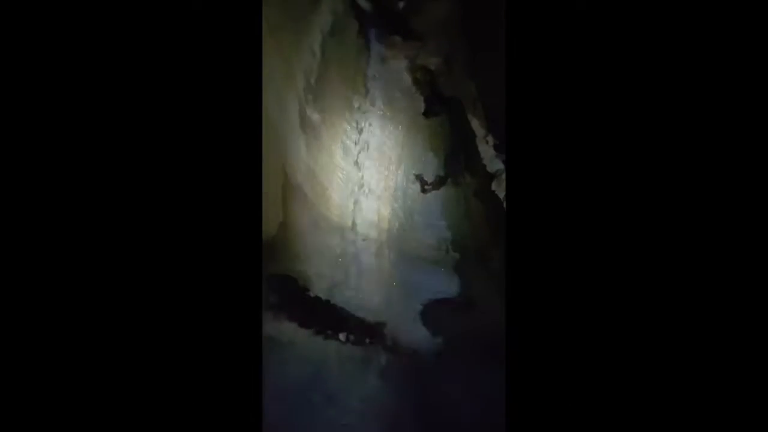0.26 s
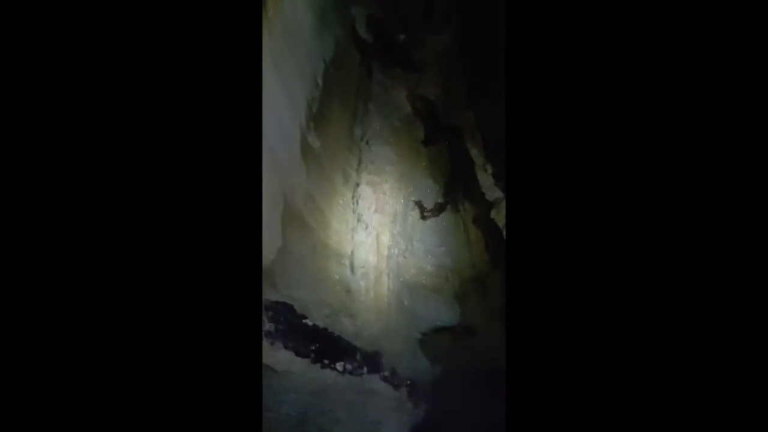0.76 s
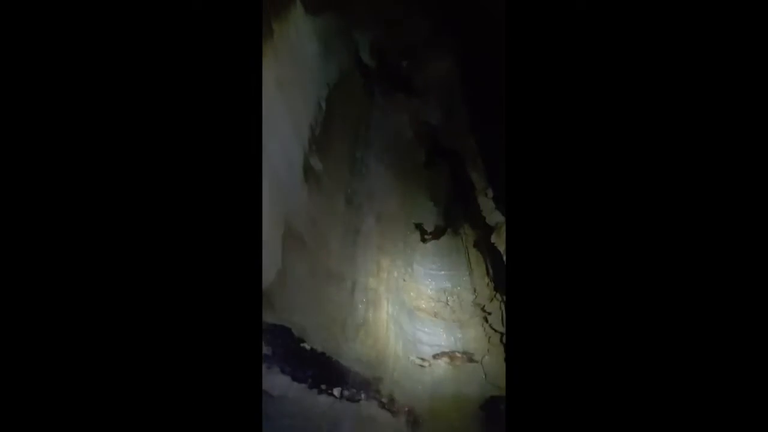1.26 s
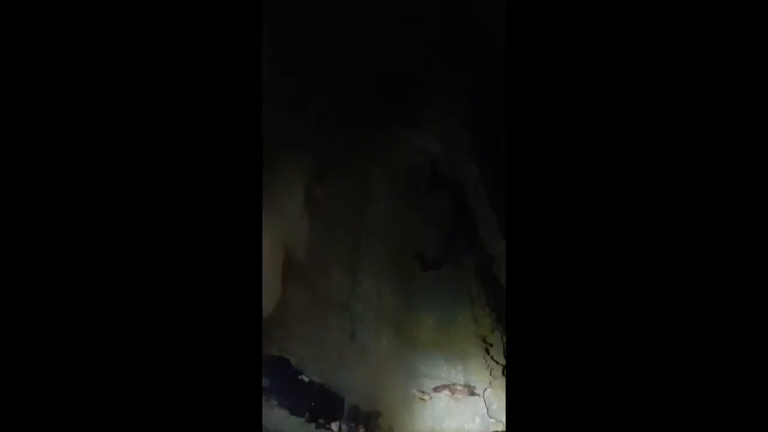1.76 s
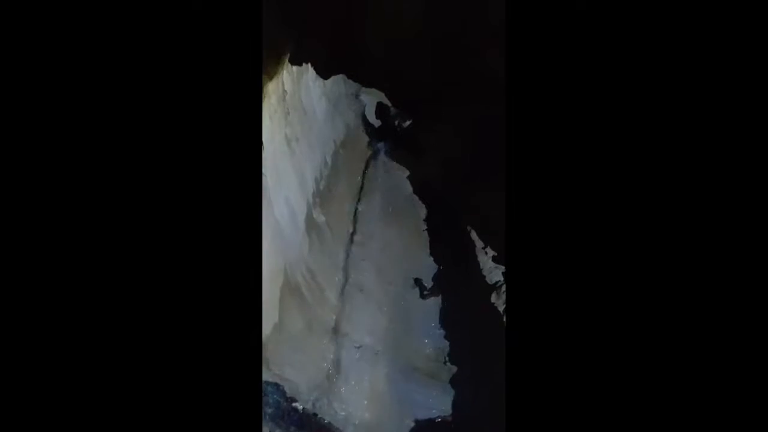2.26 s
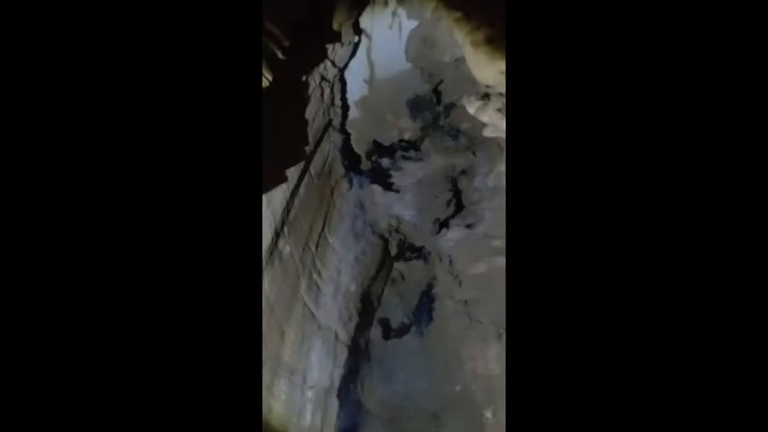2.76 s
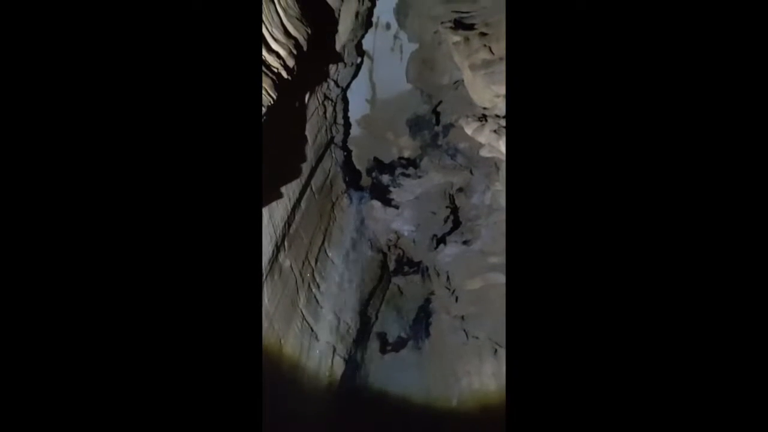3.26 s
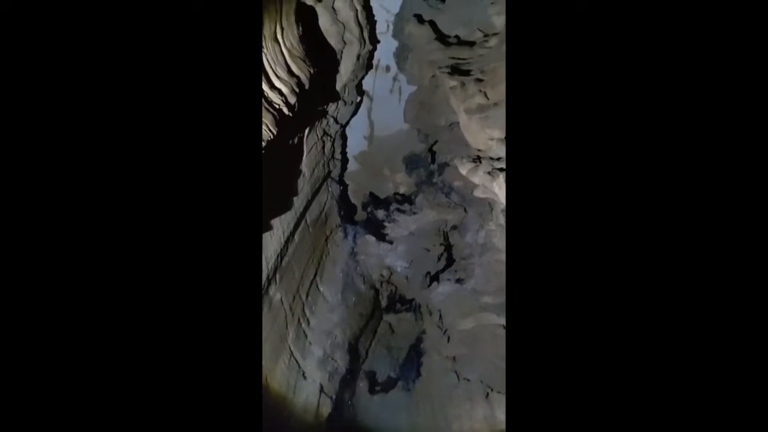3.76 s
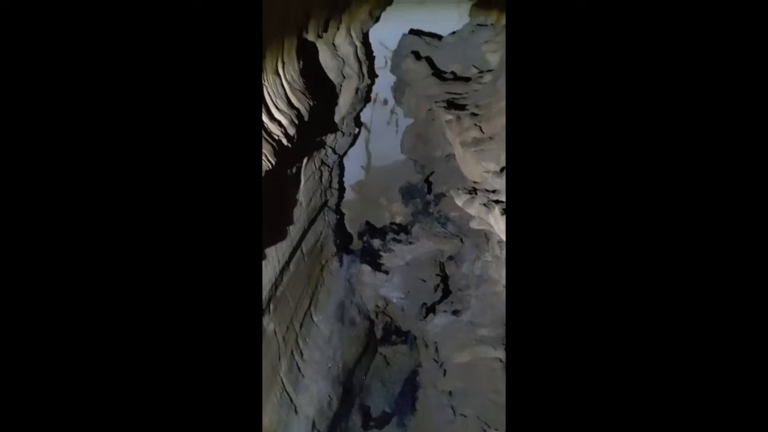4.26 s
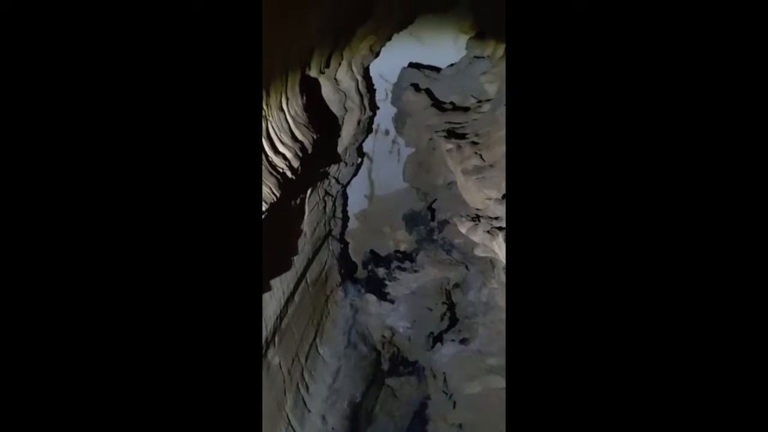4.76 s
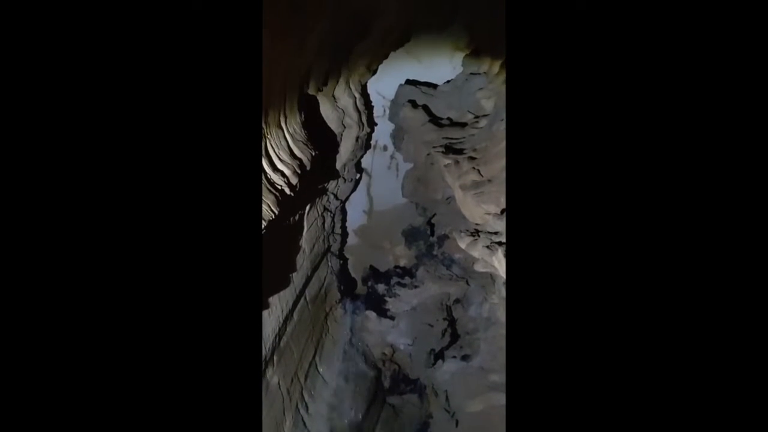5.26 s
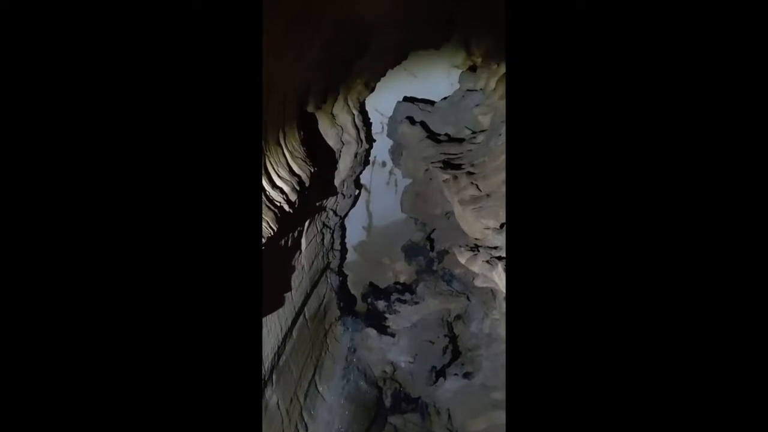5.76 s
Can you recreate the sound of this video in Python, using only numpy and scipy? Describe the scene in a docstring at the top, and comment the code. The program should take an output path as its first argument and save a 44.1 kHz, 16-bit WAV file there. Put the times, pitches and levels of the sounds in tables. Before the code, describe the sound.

A waterfall hisses steadily down a rock shaft in a large cave, with drops spattering and a few splashes on stone.

```python
"""A waterfall drops down a rock shaft in a large cave: spray hisses brightly over a duller rush and a weak rumble.
Drops spatter as ringing bubbles, and water splashes and slaps on nearby rock.
Brief faint pitches stand out by chance in the water's rush.
The walls return the fall as a diffuse field to two microphone ports a hand apart. The right port is
half closed by a drop of water at first and resonates higher once it clears."""
import sys
import numpy as np
from scipy import signal
from scipy.fft import rfft, irfft, next_fast_len
from scipy.io import wavfile

SR = 44100
rng = np.random.default_rng(int(sys.argv[2]) if len(sys.argv) > 2 else 0)


def bounce(signal):
    """Save signal as a 16-bit WAV file at the path given by the first command-line argument."""
    frames = np.transpose(np.atleast_2d(signal))
    limited = np.clip(frames, -1, 1)
    pcm = np.round(limited * 32767).astype(np.int16)
    wavfile.write(sys.argv[1], SR, pcm)


N = 265041
FFT_SIZE = next_fast_len(N, True)
HZ = np.fft.rfftfreq(FFT_SIZE, 1 / SR)
TIME = np.arange(N) / SR


def from_db(db):
    """Amplitude ratio of a level in dB."""
    return 10 ** (np.asarray(db) / 20)


def waveform(spectrum):
    """Fourier synthesis: the signal in time that has this spectrum."""
    return irfft(spectrum, FFT_SIZE)[..., :N]


def resonances(modes):
    """Frequency response of resonant peaks and dips, each a Gaussian curve in dB."""
    return from_db(sum(db * np.exp(-4 * np.log(2) * ((HZ - hz) / width) ** 2) for hz, width, db in modes))


def level_swings(rows):
    """Linear interpolation of each level column over time, as a deviation from its mean."""
    times, *columns = np.transpose(rows)
    curves = [np.interp(TIME, times, column) for column in columns]
    return [curve - curve.mean() for curve in curves]


def drift(rate_hz):
    """Random modulation: two independent low-passed noises of unit standard deviation."""
    step, settle = 40, 2000
    pole = np.exp(-2 * np.pi * rate_hz * step / SR)
    noise = rng.standard_normal((2, N // step + settle + 2))
    slow = signal.lfilter([1], [1, -2 * pole, pole ** 2], noise)[:, settle:]
    position = np.arange(N) / step
    return np.array([np.interp(position, np.arange(len(v)), (v - v.mean()) / v.std()) for v in slow])


def faint_pitches():
    """Chance spectral peaks: brief faint pitches that stand out in the rush, modelled as wavering sines."""
    # brief peaks in the water's rush: (start [s], end [s], frequency [Hz], level [dB])
    peaks = [(.2, 0.998, 130.8, -53), (1.7, 2.5, 385, -49), (2.804, 2.97, 275, -44.5),
             (3.55, 3.845, 113, -50), (3.5, 5.2, 385, -49.5), (3.8, 4.8, 664, -48), (4.85, 6.0, 130.1, -54),
             (5.3, 6.0, 268, -49)]
    out = 0
    for start, end, hz, db in peaks:
        pitch, strength = drift(6.7)
        envelope = np.sin(np.pi * np.clip((TIME - start) / (end - start), 0, 1)) ** 0.27
        phase = 2 * np.pi * np.cumsum(hz + 0.8 * pitch) / SR
        out = out + from_db(db + 0.63 * strength) * envelope * np.sin(phase)
    return out


def spatter(drops_per_s, gain_db, t60_cycles):
    """Bubble resonance: drops burst at random near either port, each ringing as a damped oscillator."""
    sizes = from_db(2.66 * np.minimum(rng.exponential(1, (2, N)), 4))
    impulses = sizes * (rng.random((2, N)) < drops_per_s / SR)
    pitches_hz = np.geomspace(800, 5000, num=24)
    pitch_index = rng.integers(0, len(pitches_hz), (2, N))
    out = 0
    for k, hz in enumerate(pitches_hz):
        decay, angle = from_db(-60 * hz / (t60_cycles * SR)), 2 * np.pi * hz / SR
        drive = impulses * (pitch_index == k) + 1e-18   # the offset prevents underflow
        ring = signal.lfilter([0, np.sin(angle)], [1, -2 * decay * np.cos(angle), decay ** 2], drive)
        out = out + ring * (hz / 2000) ** 0.52   # higher bubbles are louder
    return from_db(gain_db) * out


def splashes():
    """Impact noise: each splash is a band that rises fast and decays, partly coherent between the ports."""
    # splashes and thuds: (time [s], level [dB], low edge [Hz], high edge [Hz], 60 dB decay time [s])
    impacts = [(0.109, -25, 500, 2000, 0.11), (3.679, -43, 60, 125, 0.56), (4.907, -24.5, 500, 2600, 0.28),
               (5.019, -16.5, 1200, 5000, 0.15), (5.435, -19, 1500, 3000, 0.13)]
    out, t = np.zeros((2, N + SR)), np.arange(SR // 2) / SR
    for start, db, low_hz, high_hz, t60 in impacts:
        common, left, right = rng.standard_normal((3, len(t)))
        band = signal.butter(2, [low_hz, high_hz], "band", fs=SR, output="sos")
        noise = signal.sosfilt(band, common + 2.3 * np.array([left, right]))
        envelope = from_db(db - 60 * t / t60) * (1 - np.exp(-t * 20 / t60))
        at = round(start * SR)
        out[:, at:at + len(t)] += envelope * noise / noise.std()
    return out[:, :N]


def slaps():
    """Cavity resonance: water slapping on rock traps a pocket of air that gives a short, rough tone."""
    # air pockets: (time [s], level [dB], frequency [Hz], 60 dB decay time [s])
    pockets = [(.117, -23, 1700, .04), (4.914, -15, 2110, 0.043), (4.917, -21, 1435, 0.056),
               (4.945, -27.5, 727, 0.11), (5.025, -31, 2010, .05)]
    out, t = np.zeros((2, N)), np.arange(SR // 5) / SR
    for start, db, hz, t60 in pockets:
        wobble = 1 + 0.19 * signal.lfilter([0.05], [1, -0.95], rng.standard_normal((2, len(t))))
        ring = np.sin(2 * np.pi * hz * np.cumsum(wobble, axis=1) / SR)
        envelope = from_db(db - 60 * t / t60) * (1 - np.exp(-t / 0.003))
        at = round(start * SR)
        out[:, at:at + len(t)] += envelope * ring
    return out


def diffuse_field():
    """Spatial coherence: noise spectra at two spaced ports, reached by plane waves from all around."""
    port_gap_m, sound_speed_m_s = 0.16, 343
    scatter_hz, rumble_hz = 3000, 28
    direction_cos = np.cos(np.linspace(0, np.pi, num=20))
    weight = 1 + 0.41 * direction_cos   # a little more arrives from the right
    delay_s = port_gap_m / sound_speed_m_s * direction_cos
    coherence = np.exp(2j * np.pi * HZ[:, None] * delay_s) @ (weight / weight.sum())
    coherence *= 0.97 * np.exp(-(HZ / scatter_hz) ** 2)   # short waves scatter off the rock
    coherence *= HZ ** 2 / (HZ ** 2 + rumble_hz ** 2)   # the deepest rumble differs at each port
    left, independent = rfft(rng.standard_normal((2, FFT_SIZE)))
    return np.array([left, coherence * left + np.sqrt(1 - abs(coherence) ** 2) * independent])


def waterfall(gain_db):
    """Broadband water noise coloured by standing waves; roar, rush and spray are modulated separately."""
    # spectrum of the falling water: (frequency [Hz], relative spectral density [dB])
    fall_spectrum = [(25, -55), (50, -32), (90, -25), (150, -13.5), (250, -14.5), (600, -11), (1200, -8.5),
                     (2000, -6.5), (3800, -1), (5000, 0.5), (6500, -0.16), (9000, -1), (12500, -3.5),
                     (15800, -8.5)]
    # standing waves of the shaft and a bright ridge of the spray: (frequency [Hz], width [Hz], gain [dB])
    shaft_modes = [(82, 15, 6), (131, 10, 3), (156, 17, -6.5), (259, 20, 3.5), (326, 9.3, -5), (385, 4, -6),
                   (436, 5.4, -2.5), (907, 12, -0.5), (5700, 400, 1)]
    # surges of the spray: (time [s], relative level [dB], left minus right [dB])
    surges = [(0.0, -20, -3), (0.15, -19, -5.5), (0.22, -20, -5.0), (0.8, -19, -6.5), (0.95, -21, -5.5),
              (1.07, -19, -7), (1.86, -19.5, -6), (1.92, -19.5, -7), (1.97, -20, -6), (3.16, -19, -7),
              (3.26, -20, -6), (3.7, -19, -5.5), (4.5, -19.5, -5.5), (4.55, -19, -7.5), (5.14, -19.5, -5.5),
              (5.29, -18, -6.0), (5.98, -20, -5.5), (6.01, -18, -5.5)]
    # slow swell of the low roar and the rush above it: (time [s], relative roar [dB], relative rush [dB])
    swells = [(0.0, -41, -32.5), (0.15, -46, -33.5), (1.44, -44, -33), (2.44, -46.5, -33.5),
              (2.64, -46.5, -32), (3.01, -42.5, -34), (3.21, -46, -34.5), (4.1, -46, -33.5),
              (5.56, -46, -33.5), (6.01, -42.5, -33.5)]
    hz, db = np.transpose(fall_spectrum)
    colour = from_db(np.interp(np.log(HZ + 1), np.log(hz), db))
    water = diffuse_field() * colour * resonances(shaft_modes)
    water /= np.std(waveform(water))
    spray_db, sway_db = level_swings(surges)
    spray_db = spray_db + sway_db * np.array([[0.55], [-0.45]])   # left rises as right falls
    roar_db, rush_db = level_swings(swells)
    roar_db += 0.8 * drift(rate_hz=5.8)[0]
    rush_db += 0.5 * drift(rate_hz=9.5)[0]
    rumble_top_hz, roar_top_hz, spray_foot_hz = 55, 513, 3080
    octave, common_flicker = np.log2(HZ + 1), drift(6.4)
    out = 0
    for centre in np.arange(4, 14.5, 0.5):   # overlapping bands, half an octave apart
        band = np.cos(np.pi * np.clip(octave - centre, -0.5, 0.5)) ** 2
        centre_hz = 2 ** centre
        roar = 1 / (1 + (centre_hz / roar_top_hz) ** 4)
        spray = 1 / (1 + (spray_foot_hz / centre_hz) ** 4)
        rush = max(1 - roar - spray, 0)
        rumble = 1 / (1 + (centre_hz / rumble_top_hz) ** 4)
        swell_db = roar * roar_db + rush * rush_db + spray * spray_db
        depth_db = 0.54 + 1.06 * rush + 3 * rumble   # the lowest rumble comes in lumps
        flicker_db = depth_db * drift(12) + 0.49 * drift(17) + 0.18 * common_flicker
        out = out + from_db(swell_db + flicker_db) * waveform(water * band)
    return from_db(gain_db) * out


def scene():
    """Superposition of the fall, its spatter, splashes, slaps and the faint pitches in its rush."""
    return (waterfall(gain_db=-17) + spatter(drops_per_s=400, gain_db=-39.5, t60_cycles=61)
            + splashes() + slaps() + faint_pitches())


def record(dry):
    """Port resonance colours each channel, higher on the right once it clears; filters limit the band."""
    # response of the left port: (frequency [Hz], width [Hz], gain [dB])
    left_port = [(60, 75, -3), (296, 170, 1.5), (3500, 1700, -.5), (7000, 1500, 0.8), (10060, 4360, -9),
                 (13100, 3300, -7)]
    # right port, half closed by a drop: (frequency [Hz], width [Hz], gain [dB])
    right_port_wet = [(5420, 620, 2.5), (5860, 4200, 1.5), (7780, 3700, 5), (12760, 2850, -5.5)]
    # right port, open: (frequency [Hz], width [Hz], gain [dB])
    right_port_clear = [(2070, 1100, 1.4), (9040, 3050, 3.2), (11160, 3460, 4.9)]
    clears_at_s, clearing_s = 2.854, 0.0078
    left_spectrum, right_spectrum = rfft(dry, FFT_SIZE)
    left = waveform(left_spectrum * resonances(left_port))
    wet = waveform(right_spectrum * resonances(right_port_wet))
    clear = waveform(right_spectrum * resonances(right_port_clear))
    cleared = np.clip((TIME - clears_at_s) / clearing_s, 0, 1)
    right = (1 - cleared) * wet + cleared * clear
    bass_cut = signal.butter(2, 32, "high", fs=SR, output="sos")   # microphones lose the deepest bass
    treble_cut = signal.ellip(14, 0.3, 80, 15740, fs=SR, output="sos")
    return signal.sosfilt(treble_cut, signal.sosfilt(bass_cut, np.array([left, right])))


dry = scene()
out = record(dry)
bounce(out)
```